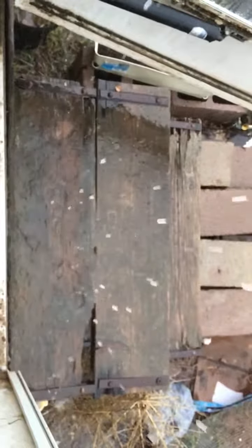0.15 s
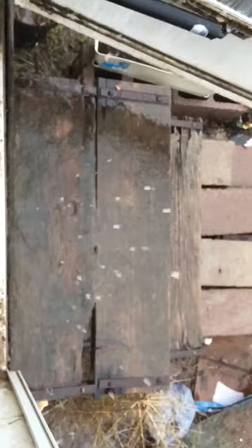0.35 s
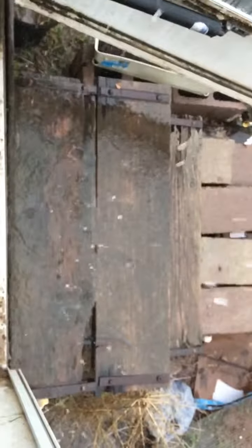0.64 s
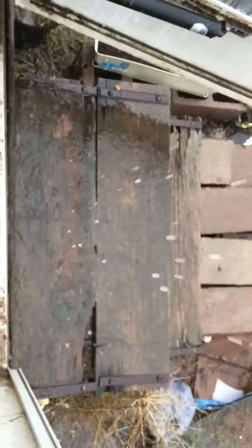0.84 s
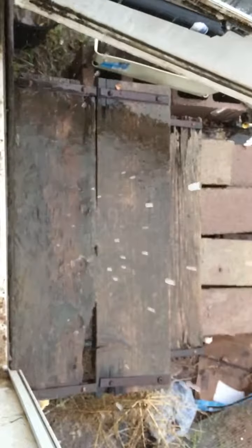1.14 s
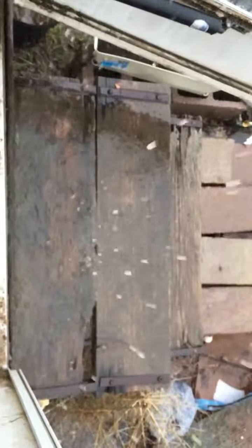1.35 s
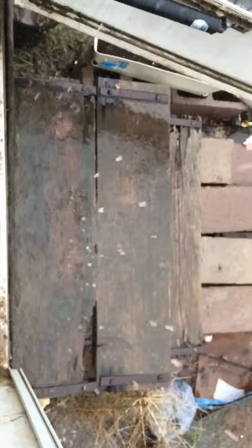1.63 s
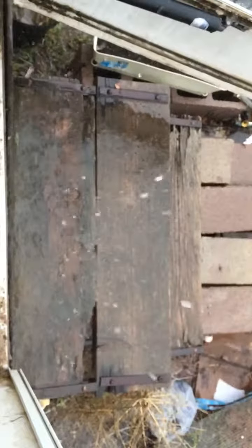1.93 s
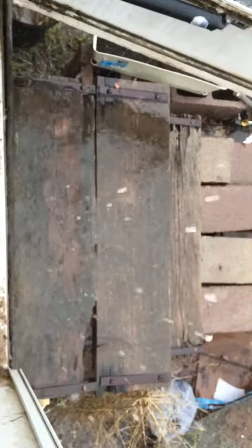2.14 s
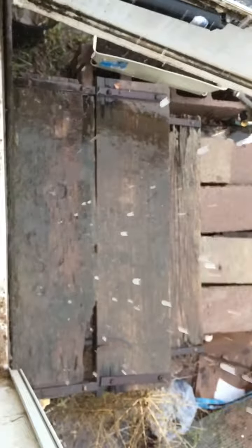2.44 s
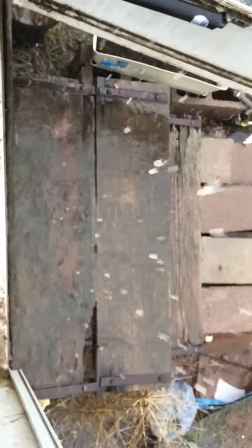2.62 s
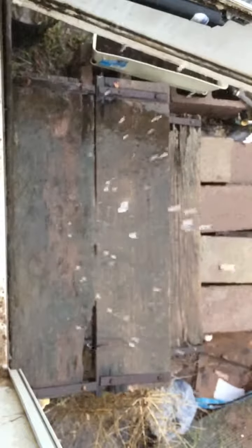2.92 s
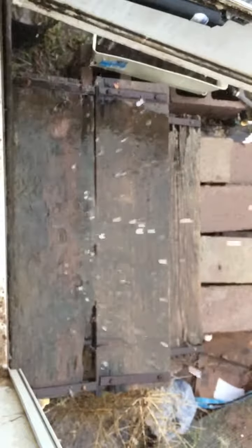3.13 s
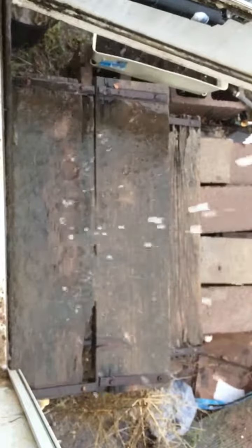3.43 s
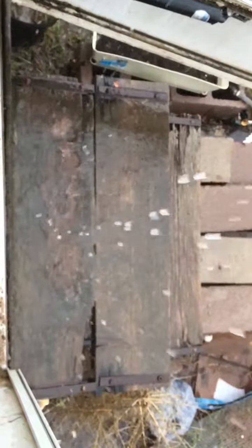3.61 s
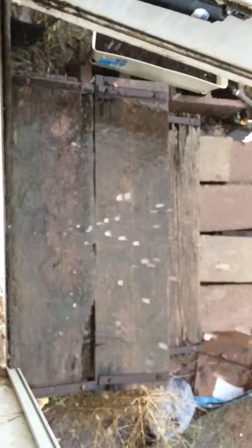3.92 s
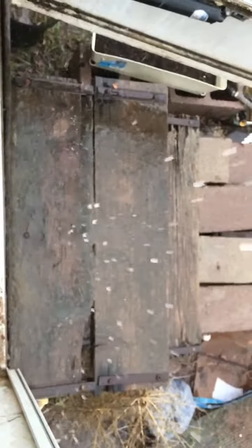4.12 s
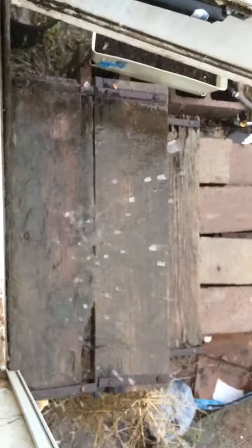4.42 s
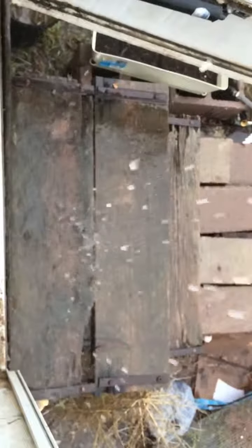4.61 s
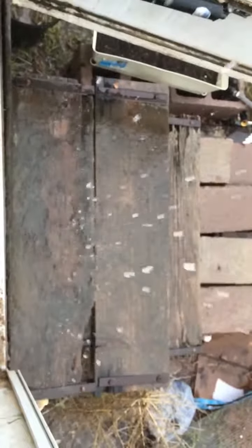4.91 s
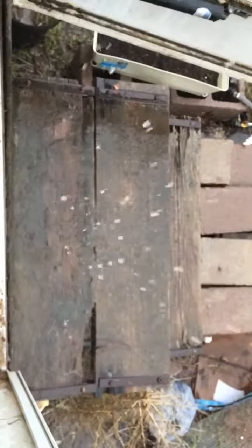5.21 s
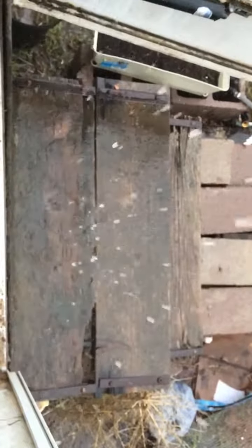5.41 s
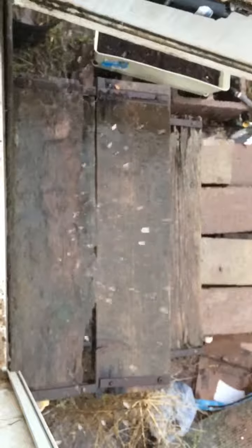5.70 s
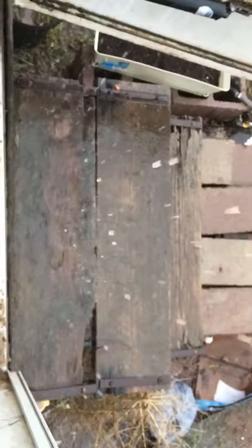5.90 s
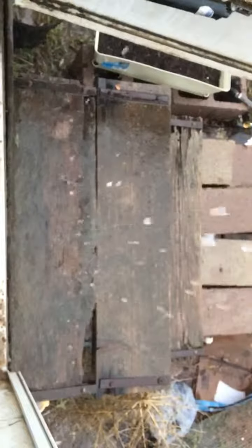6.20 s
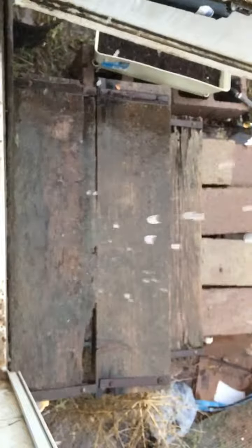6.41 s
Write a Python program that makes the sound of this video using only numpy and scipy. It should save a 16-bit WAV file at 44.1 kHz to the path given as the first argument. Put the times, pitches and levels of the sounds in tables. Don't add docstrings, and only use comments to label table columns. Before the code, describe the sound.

Slowed-down heavy raindrops tap dully on weathered wooden steps, muffled and close, with low board thuds over a soft wash of distant rain.

```python
import sys
import numpy as np
from scipy import signal
from scipy.fft import rfft, irfft
from scipy.io import wavfile

SR = 44100
rng = np.random.default_rng(int(sys.argv[2]) if len(sys.argv) > 2 else 0)


def wrap_up_sound(samples):
    columns = np.atleast_2d(samples).T
    tamed = np.clip(columns, -1, 1)
    steps = np.round(tamed * 32767).astype(np.int16)
    wavfile.write(sys.argv[1], SR, steps)


def natural_amplitude(level_db):
    exponent = np.asarray(level_db, float) / 20
    return 10 ** exponent


N = 288855


def rms_one(x):
    return x / np.sqrt(np.mean(x ** 2) + 1e-20)


def at_hz(points, hz):
    p = np.array(points)
    return np.interp(np.log(np.maximum(hz, 1)), np.log(p[:, 0]), p[:, 1])


def drift(rate):
    knots = rng.standard_normal(1000)
    return np.interp(np.arange(N) / SR * rate, np.arange(len(knots)), knots)


def coloured_noise(spectrum):
    hz = np.fft.rfftfreq(N, 1 / SR)
    return rms_one(irfft(rfft(rng.standard_normal(N)) * natural_amplitude(at_hz(spectrum, hz)), N))


def rain_vigour():
    # start_s, level_db
    vigour = [(0.0, -36.5), (1.31, -34), (1.75, -39), (2.46, -33), (3.15, -39.5), (3.65, -34.5),
              (3.98, -31), (4.54, -33.5), (4.76, -31), (5.12, -36), (5.76, -33.5), (5.97, -33.5),
              (6.55, -32.5)]
    return np.interp(np.arange(N) / SR, *np.transpose(vigour))


def rain_wash(rain_db):
    # frequency_hz, density_db (dB per Hz)
    wash_colour = [(180, -31), (300, -10.5), (618, -3), (765, 2.5), (1430, -0.5), (2290, -4), (2980, -31.5),
                   (5040, -120)]
    flicker = natural_amplitude(4.2 * drift(25) + 2.1 * drift(6.0))
    return natural_amplitude(rain_db - 2.0) * flicker * coloured_noise(wash_colour)


def far_drops(rain_db, per_s=150, spread_db=5.0, cycles=10.0):
    sizes = natural_amplitude(spread_db * np.minimum(rng.exponential(1, N), 3)) * rng.choice([-1, 1], N)
    born = rng.random(N) < per_s / SR
    pitches = np.geomspace(300, 2200, 14)
    dealt = rng.integers(0, len(pitches), N)
    patter = np.zeros(N)
    for k, hz in enumerate(pitches):
        decay = natural_amplitude(-60 * hz / (cycles * SR))
        turn_rad = 2 * np.pi * hz / SR
        ring = [1, -2 * decay * np.cos(turn_rad), decay * decay]
        patter += signal.lfilter([0, np.sin(turn_rad)], ring, sizes * born * (dealt == k) + 1e-18)
    return natural_amplitude(rain_db - 7) * rms_one(patter)


def low_rumble(rain_db):
    # frequency_hz, density_db (dB per Hz)
    rumble_colour = [(12, -17.5), (25, -7.5), (50, -10), (130, -8.5), (240, -11), (400, -13.5),
                     (700, -26.5)]
    rumble_db = -37.5 + 0.4 * (rain_db - rain_db.mean())
    return natural_amplitude(rumble_db + 0.37 * drift(9.7)) * coloured_noise(rumble_colour)


def faint_hum():
    tone = np.sin(2 * np.pi * 193.1 * np.arange(N) / SR)
    return natural_amplitude(-50.5 + 2.2 * drift(26.0)) * tone


def knocks(rows, damping, gain_db, snap_db, splash_db, splash_t60_s, tail_db):
    # frequency_hz, t60_s
    tail_t60 = [(150, 0.3), (400, 0.35), (1000, 0.29), (2300, 0.36)]
    s, peak_db, hz, width_hz = np.transpose(rows)[:4, :, None]
    t = np.arange(SR // 3) / SR
    rate = damping * np.pi * width_hz
    contact_t = t[:3000]
    crest = contact_t - 1 / rate
    lean = 0.3 * rng.standard_normal((len(rows), 1))
    swell = -rate * contact_t * np.exp(-rate * crest)
    contact = swell * np.cos(2 * np.pi * hz * crest + lean)
    snap = crest / 0.0001
    contact += natural_amplitude(snap_db) * snap * np.exp(-snap ** 2)

    early = natural_amplitude(splash_db - 60 * t / splash_t60_s) * np.minimum(t / 0.003, 1)
    tail = natural_amplitude(tail_db - 60 * t / at_hz(tail_t60, hz)) * np.minimum(t / 0.0021, 1)
    paths = (early + tail) * rng.standard_normal((len(rows), len(t)))
    paths[:, 0] = 1
    heard = natural_amplitude(peak_db + gain_db) * signal.fftconvolve(contact, paths, axes=1)

    first = np.round((s - 1 / rate) * SR).astype(int)
    at = first + np.arange(heard.shape[1])
    return np.bincount(np.clip(at, 0, N).ravel(), heard.ravel(), N + 1)[:N]


def widened(rows, share):
    return [(s, db, hz, share * hz) for s, db, hz in rows]


def thrown_back(rows, surfaces):
    echoes = []
    for s, db, hz, width_hz in rows:
        for lag_s, spread_s, loss_db, pitch_share in surfaces:
            late_s = s + lag_s + spread_s * rng.standard_normal()
            echo_hz = hz * pitch_share * 2 ** (0.2 * rng.standard_normal())
            echoes.append((late_s, db + loss_db, echo_hz, width_hz))
    return echoes


def without_bass(x):
    return signal.sosfiltfilt(signal.butter(2, 320, "high", fs=SR, output="sos"), x)


def falling_drops():
    # start_s, peak_db, centre_hz, width_hz
    strikes = [(0.0478, -10, 1280, 710), (0.362, -8, 1220, 700), (0.5047, -8, 1625, 840),
               (0.9693, -3.5, 1034, 400), (1.0951, -8.5, 996, 570), (1.2023, -12.5, 1200, 890),
               (1.4399, -4, 1140, 720), (2.0648, -6, 1415, 610), (2.4229, -11, 900, 250),
               (2.4786, 1.0, 795, 380), (2.5842, -7, 1358, 420), (2.8643, -11, 829, 260),
               (3.0666, 0.0, 1730, 590), (3.525, -10, 1157, 1240), (3.7715, -2, 1330, 970),
               (3.852, -5, 1240, 540), (3.992, -9, 1385, 680), (4.0756, -0.9, 1226, 750),
               (4.1529, -9, 1168, 310), (4.2185, -2, 1400, 730), (4.3314, -5, 1627, 530),
               (4.5615, -3.0, 1540, 670), (4.6719, -7.5, 1580, 750), (4.8187, -8.5, 1300, 800),
               (4.8882, -4, 1190, 660), (5.365, -6, 980, 550), (5.4644, -10, 1500, 700),
               (5.7476, -4, 1210, 660), (5.9277, -6.5, 1100, 600), (6.1972, -12.5, 1310, 450)]
    # start_s, peak_db, centre_hz
    taps = [(0.1844, -23, 930), (0.5416, -17.5, 990), (0.6698, -21, 1230), (1.0551, -18, 1360),
            (1.6585, -21, 1280), (1.829, -16.5, 1740), (2.0048, -17, 1450), (2.3317, -12, 1350),
            (2.5245, -30.5, 930), (2.6547, -17, 1670), (2.802, -19.5, 1250), (2.9257, -15.5, 1460),
            (3.3093, -20, 1210), (3.407, -24, 1830), (3.4434, -22, 1420), (3.5848, -16.5, 1530),
            (3.7354, -17.5, 1450), (3.9194, -16, 1520), (4.4682, -20.5, 1800), (4.5108, -15, 1010),
            (4.6158, -15, 1300), (4.7646, -15.0, 1410), (4.9389, -11.5, 1540), (5.0314, -13.5, 1470),
            (5.2441, -18.5, 980), (5.5042, -20, 1360), (6.0057, -21, 920), (6.0902, -39, 1580),
            (6.269, -18, 1820), (6.3751, -17.0, 1080)]
    # start_s, peak_db, centre_hz
    more_taps = [(0.2232, -18, 1314), (0.2473, -22.5, 1283), (0.2728, -20, 900), (1.1719, -22.5, 1680),
                 (1.3077, -35, 1444), (1.3981, -35, 1690), (1.5103, -19, 1510), (1.833, -19, 776),
                 (1.8818, -32, 1910), (1.9622, -21.5, 813), (2.1618, -23.5, 1195), (2.549, -18.5, 870),
                 (2.7007, -23, 1560), (2.7603, -26, 1310), (3.0204, -26, 1550), (3.1632, -26, 2050),
                 (3.2799, -25, 1030), (3.8288, -12.5, 1400), (4.0417, -23, 1860), (4.1858, -20, 910),
                 (4.2877, -28, 1620), (4.6458, -17.5, 1490), (5.1852, -17.5, 1190), (5.2896, -20.5, 1584),
                 (5.4297, -28, 1340), (5.5495, -20, 1260), (5.6183, -23.5, 1150), (5.8597, -20.5, 980),
                 (5.899, -21, 1830), (5.9159, -17, 1450)]
    return strikes + widened(taps + more_taps, 0.32)


def drop_taps(drops):
    return without_bass(knocks(drops, damping=1.48, gain_db=1.19, snap_db=-18.5,
                               splash_db=-28, splash_t60_s=0.04, tail_db=-34.5))


def bright_spray(drops):
    spray = []
    for s, db, hz, _ in drops:
        spray_db = -22.5 + 0.27 * db + 8 * np.log2(hz / 1300)
        spray.append((s, spray_db, 1954, 650))
    return knocks(spray, damping=1.4, gain_db=-0.5, snap_db=-30.5,
                  splash_db=-14.5, splash_t60_s=0.083, tail_db=-38.5)


def board_thuds():
    # start_s, peak_db, centre_hz, width_hz
    thuds = [(0.0517, -8.5, 429, 120), (0.2751, -21.5, 393, 120), (0.3647, -20, 477, 120),
             (0.5441, -19, 510, 117), (0.97, -12, 520, 130), (1.2048, -21.5, 537, 111),
             (1.4402, -37.5, 420, 276), (2.4229, -27, 496, 162), (2.4788, -19, 500, 160),
             (2.8637, -29.5, 442, 290), (3.531, -10, 434, 240), (3.6022, -18, 324, 210),
             (3.7719, -22.5, 430, 190), (3.8531, -12, 370, 200), (4.0757, -13.5, 440, 280),
             (4.1193, -16, 320, 220), (4.5892, -22, 298, 142), (4.8202, -11, 387, 190),
             (4.887, -11, 389, 117.5), (6.3056, -13, 248, 72.5), (5.3646, -14, 490, 128),
             (5.5186, -18.5, 388, 110), (5.7535, -4.5, 340, 230), (5.8528, -19, 324, 118),
             (5.9351, -7.5, 350, 203), (6.118, -15, 314.5, 205), (6.2074, -11.5, 410, 167),
             (6.2827, -18, 260, 81.5), (6.3489, -14, 264, 78), (6.3799, -16.5, 312, 212)]
    # lag_s, lag_spread_s, loss_db, pitch_share (of the centre)
    thud_walls = [
        (0.0192, .0012, -2.5, 1.08),
    ]
    return knocks(thuds + thrown_back(thuds, thud_walls), damping=1.17, gain_db=-3.5, snap_db=-39.5,
                  splash_db=-34.5, splash_t60_s=0.08, tail_db=-39.0)


def returns_of_drops(drops):
    # lag_s, lag_spread_s, loss_db, pitch_share (of the centre)
    walls = [
        (.0055, .0012, -16.0, 0.85),
        (.0105, .001, -9, .93),
        (.019, .0012, -14, .88),
    ]
    # start_s, peak_db, centre_hz
    strong_returns = [(0.0534, -7.5, 1400), (0.0933, -11, 1150), (0.5559, -14.5, 840), (0.9731, -8.5, 1010),
                      (0.9769, -18, 1100), (0.9873, -11, 900), (1.1066, -12.5, 1080), (1.1177, -8.5, 1056),
                      (1.4576, -9.5, 1100), (2.0709, -7.5, 1390), (2.4993, -4, 720), (2.5973, -9.5, 1260),
                      (3.3227, -12.5, 1220), (3.3359, -10, 1440), (3.7817, -11.5, 1480), (2.4426, -16, 780),
                      (4.0041, -12, 1110), (4.0939, -4.0, 850), (4.225, -13, 950), (4.2332, -12.5, 1200),
                      (4.5732, -7, 1880), (4.5803, -20, 1210), (4.698, -4, 1520), (4.907, -13.0, 830),
                      (5.3859, -12.5, 790), (5.7576, -9, 990), (5.7659, -12.5, 1200), (2.8834, -17.5, 770),
                      (5.9342, -12, 1100), (6.291, -10, 1080)]
    later = thrown_back(drops, walls) + widened(strong_returns, 0.55)
    return without_bass(knocks(later, damping=1.59, gain_db=3.0, snap_db=-16.5,
                               splash_db=-29.5, splash_t60_s=0.029, tail_db=-39))


def spill():
    # start_s, peak_db
    spills = [(0.362, -57), (0.4997, -50), (0.969, -52.5), (1.1615, -57), (1.2046, -62.5), (1.436, -51.5),
              (1.6545, -59), (1.8266, -52.5), (1.877, -56), (2.0604, -53), (2.3105, -59), (2.5805, -49),
              (2.7777, -56.5), (3.016, -63), (3.292, -64.5), (3.5208, -50), (3.7658, -52), (3.8486, -52),
              (3.9882, -56), (4.2166, -51.5), (4.3263, -51), (4.5566, -46), (4.6732, -50), (4.7495, -56),
              (5.2833, -58.5), (5.7483, -55), (6.0852, -65), (6.2, -55.5)]
    # frequency_hz, density_db (dB per Hz)
    spill_colour = [(2250, -57.5), (2400, -1), (3000, 0), (4000, -14.5), (5500, -28), (7000, -63)]
    spacing, lead_s, span_s = 128, 0.01, 0.036
    t = np.arange(0, N, spacing) / SR
    s, peak_db = np.transpose(spills)[:, :, None]
    swell = np.sin(np.pi * np.clip((t - s + lead_s) / span_s, 0, 1)) ** 2
    ticks = np.zeros(N)
    ticks[::spacing] = (natural_amplitude(peak_db - 1.5) * swell).sum(axis=0) * rng.standard_normal(len(t))
    colour = natural_amplitude(at_hz(spill_colour, np.fft.rfftfreq(N, 1 / SR)))
    one_tick_peak = irfft(colour, N)[0]
    return irfft(rfft(ticks) * colour, N) / one_tick_peak


def scene():
    rain_db = rain_vigour()
    background = rain_wash(rain_db) + far_drops(rain_db) + low_rumble(rain_db) + faint_hum()
    drops = falling_drops()
    near = drop_taps(drops) + bright_spray(drops) + board_thuds() + returns_of_drops(drops)
    return (near + background)[None]


def band_limit(x):
    return signal.sosfilt(signal.butter(12, 15200, fs=SR, output="sos"), x)


def record(dry):
    hz = np.fft.rfftfreq(N, 1 / SR)
    top_hz, edge_hz = 2305, 8
    wall = 1 / (1 + np.exp(np.clip((hz - top_hz) / edge_hz, -50, 14)))
    banded = irfft(rfft(dry) * wall, N)
    mix = np.clip(banded + spill(), -1, 1)
    return band_limit(mix)


dry = scene()
out = record(dry)
wrap_up_sound(out)
```